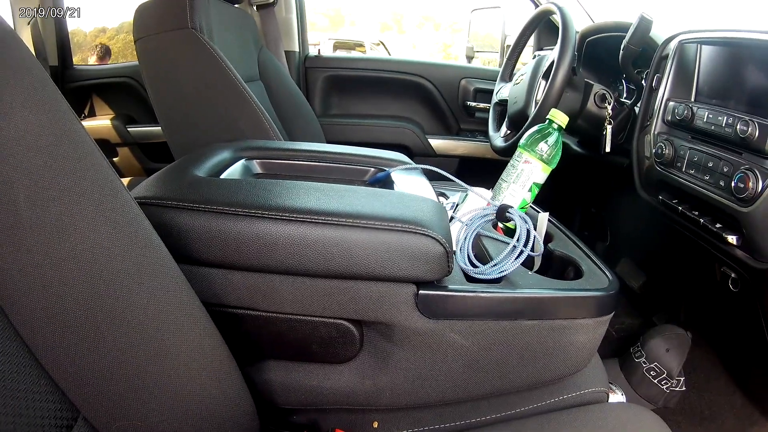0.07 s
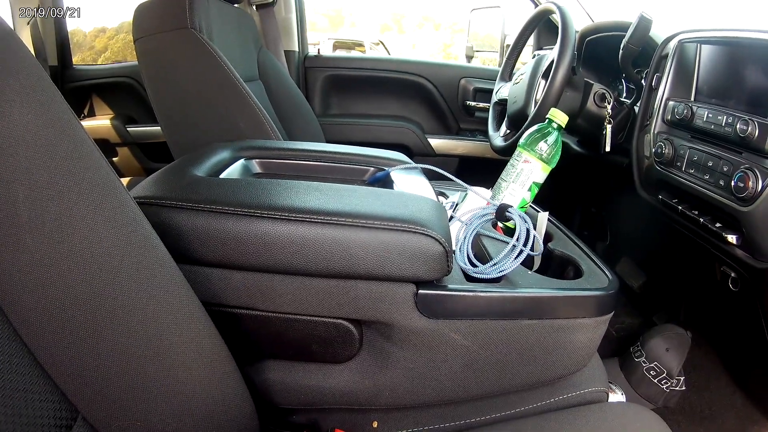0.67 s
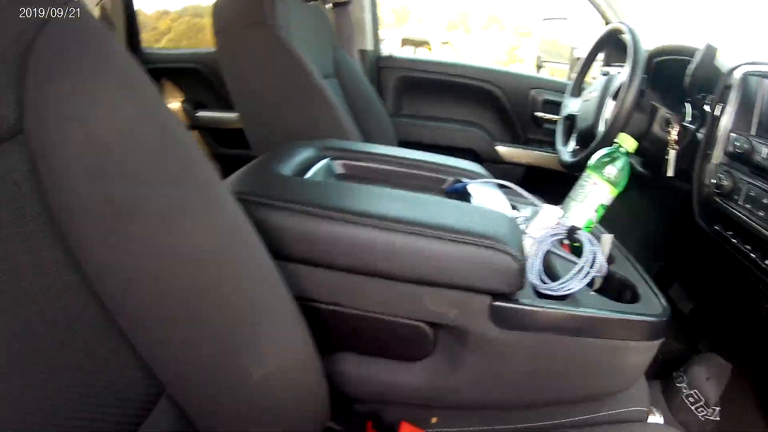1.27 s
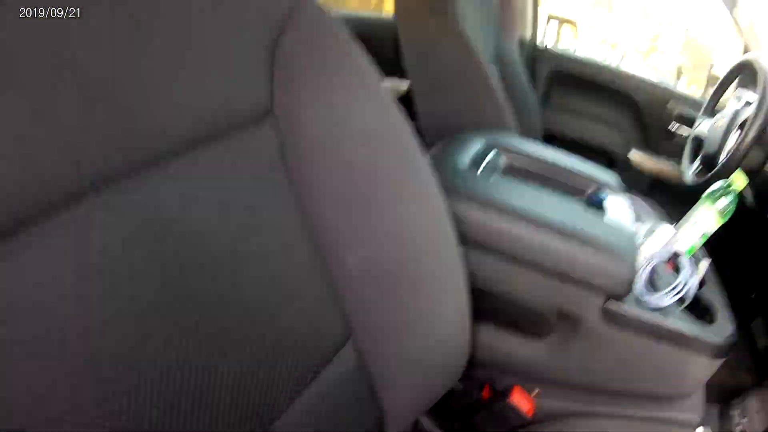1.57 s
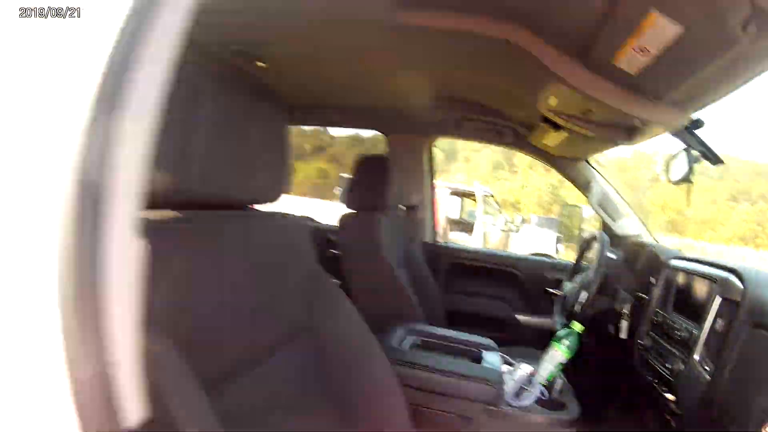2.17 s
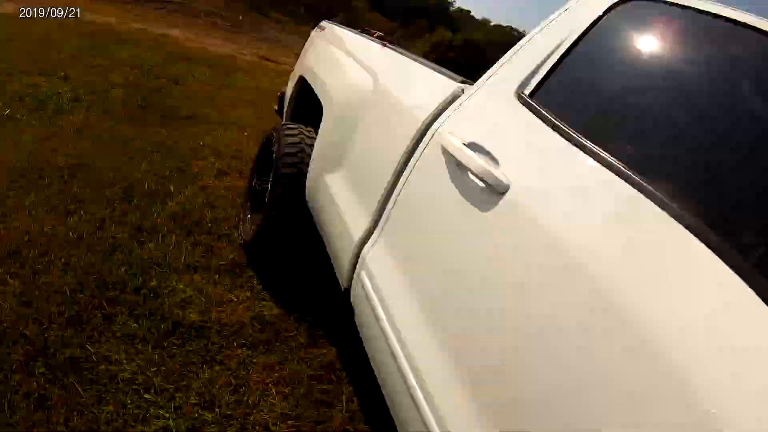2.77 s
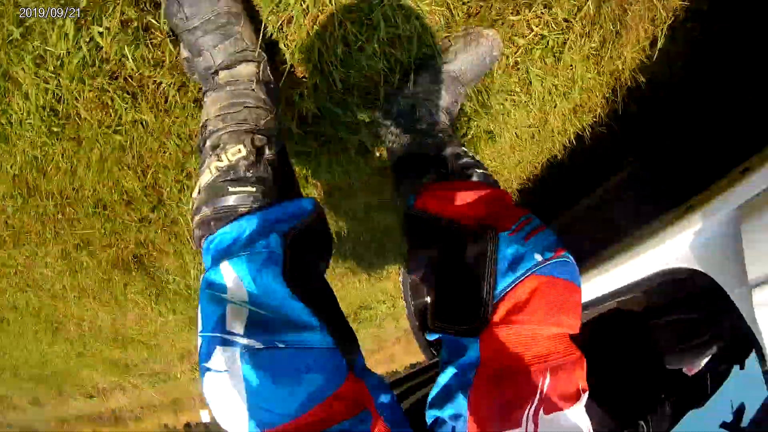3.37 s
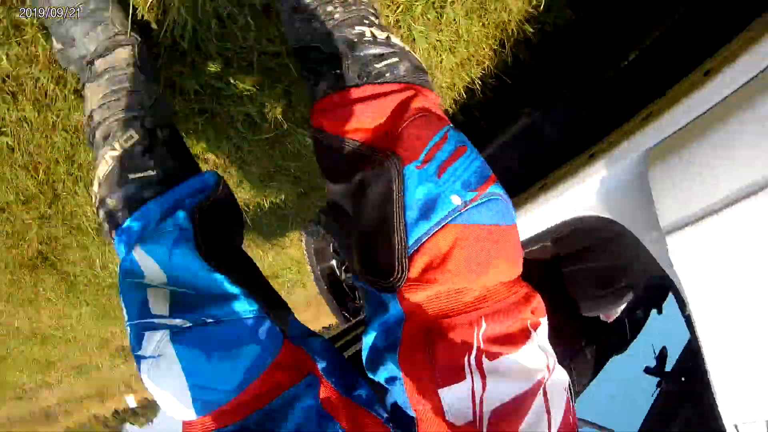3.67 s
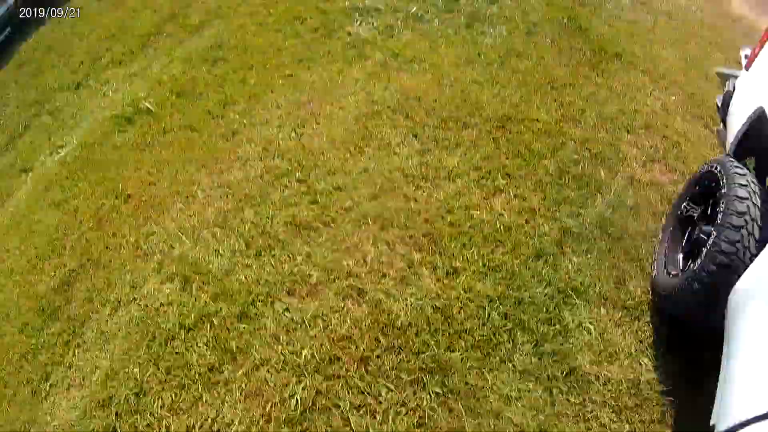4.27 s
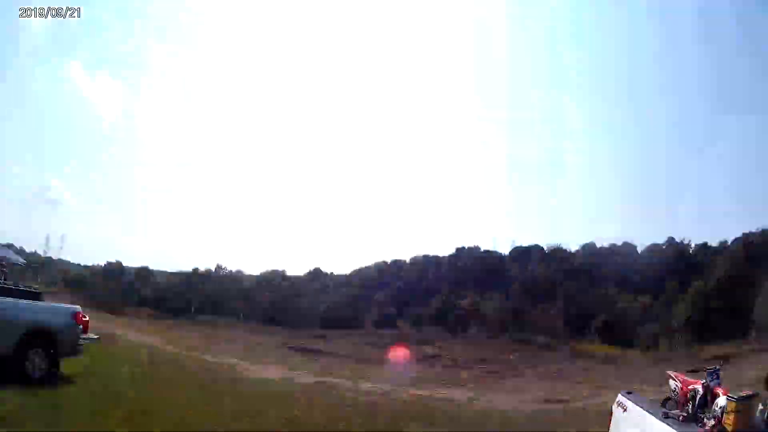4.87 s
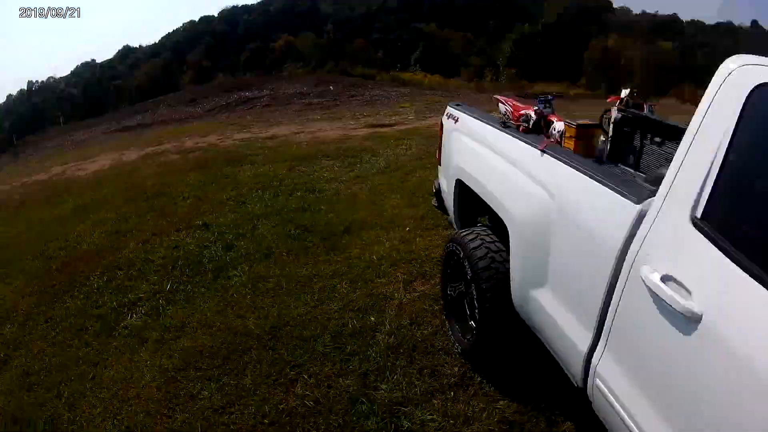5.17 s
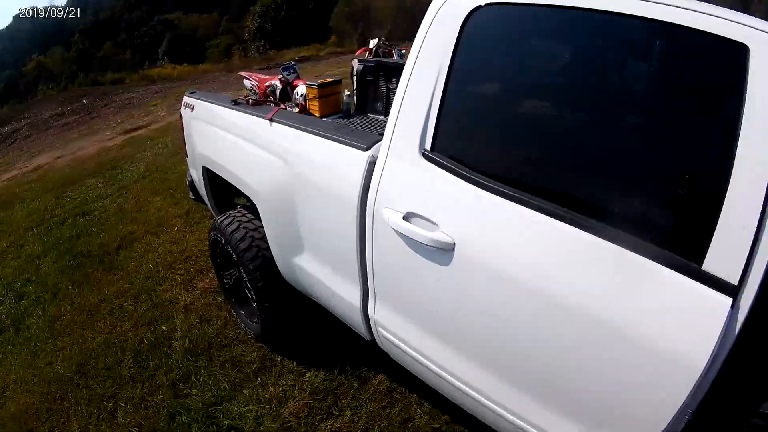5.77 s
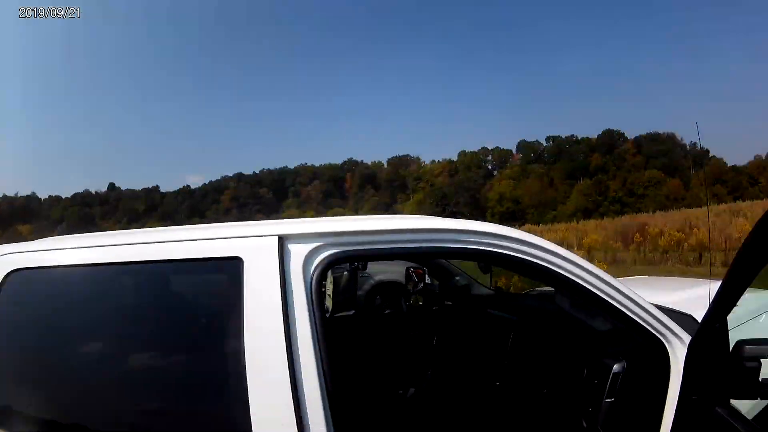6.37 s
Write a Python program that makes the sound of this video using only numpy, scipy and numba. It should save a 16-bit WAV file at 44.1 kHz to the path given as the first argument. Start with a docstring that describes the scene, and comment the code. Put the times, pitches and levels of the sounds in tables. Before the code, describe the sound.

Very close knocks and rattles strike the plastic case around a body-worn microphone as a person shifts off a truck seat and steps onto grass. They come singly at first, then bunch into louder clatters in the second half, mixed with low thumps, rumble and light rubbing of clothing. A small metal part rings faintly after the harder hits. Behind lie a thin hiss and a soft distant rush that grows toward the end.

```python
"""A quiet open field, beside a parked pickup. A rider in boots and nylon gear climbs out onto the grass.
The microphone is inside the plastic case of a camera worn on the body, so the handling is very close:
knocks and rattles all ring the same shell, and a small metal part sings on faintly. Body movements
thump through the mount and cloth rubs nearby. Behind it lie a thin hiss and a soft far-off rush."""
import sys
import numpy as np
from scipy import signal
from scipy.fft import rfft, irfft
from scipy.io import wavfile
from scipy.ndimage import uniform_filter1d
from numba import njit

SR = 44100
rng = np.random.default_rng(int(sys.argv[2]) if len(sys.argv) > 2 else 0)


def unload_audio(sound):
    """Save the sound as a 16-bit wav file, at the path given as the first command line argument."""
    columns = np.transpose(np.atleast_2d(sound))
    # keep every value between -1 and 1, then stretch to whole-number steps
    steps = np.round(np.clip(columns, -1, 1) * 32767)
    wavfile.write(sys.argv[1], SR, steps.astype(np.int16))


N = 286650
TIME = np.arange(N) / SR
FREQ = np.fft.rfftfreq(2 * N, 1 / SR) + 1e-3

# blows on the case, right at the microphone; hard_hz and bass_hz are the corners of the contact:
# start_s, impulse_db, hard_hz, bass_hz, damping, rim_echo_s, rim_share
CASE_BLOWS = [(1.4005, 0.4, 7660, 1473, 0.59, 0.0014, -0.24), (1.4853, -12.5, 7073, 671, 2.69, 0.001, 0.29),
              (2.8487, -16.5, 10590, 309, 1, 0.0019, 0.83), (2.8839, 11, 4030, 474, 2.8, 0.0015, -0.048),
              (3.538, -29.5, 1600, 150, 1, 0.0012, 0.49), (3.8369, -11.5, 12300, 5243, 1.1, 0.0004, 0.35),
              (3.842, -10.5, 4020, 645, 1.78, 0.00053, 0.32), (4.413, 11, 5900, 966, 1.72, 0.00054, -0.47),
              (4.417, 18, 1360, 4640, 1.16, 0.00065, 0.95), (4.4207, -4, 6500, 1671, 1, 0.00031, 0.47),
              (4.4468, 5.5, 1270, 460, 0.93, 0.0022, -0.31), (4.5323, -2.5, 1170, 102, 1.3, 0.0022, -0.077),
              (4.7033, 1.5, 1360, 173, 1.8, 0.0017, 0.16), (4.831, -1.1, 1140, 157, 1.6, 0.0018, 0.057),
              (5.1182, 5, 2181, 217, 8.2, 0.00082, -0.41), (5.142, -9.5, 3530, 476, 0.5, 0.00087, 0.38),
              (5.2899, -10.5, 3570, 3244, 1.2, 0.0012, 0.62),
              (5.307, -17, 5200, 3510, 0.33, 0.00058, -0.49), (5.3624, 14, 3450, 49, 5, 0.0011, -0.3),
              (5.3694, 8.5, 7700, 3970, 0.97, 0.00021, -0.39), (5.3806, -6.5, 4800, 111, 1.6, 0.002, 0.15),
              (5.469, -4, 20570, 833, 1.9, 0.00053, 0.61), (5.4847, 14, 6460, 6300, 5.1, 0.00047, 0.41),
              (6.0512, -31.5, 3499, 153, 0.75, 0.00047, -0.8), (6.1263, 14, 2120, 830, 1.98, 0.0024, 0.053),
              (6.305, 1.15, 1550, 34, 1.46, 0.00082, -0.31)]


def case_knocks(slips_per_s=140, spring_db=0.5):
    """Blows, taps and slips ring the plastic shell, its mount and a loose metal part."""
    # light taps and soft dull knocks on the case: start_s, impulse_db, hard_hz
    light_taps = [(2.376, -25, 2600), (2.78, -37, 12000), (3.2, -30, 450), (3.257, -25.5, 1100),
                  (3.447, -27.5, 900), (3.796, -30, 900), (4.39, -22, 2200), (4.405, -13, 1398),
                  (4.507, -24, 12000), (4.741, -18.5, 700), (4.861, -22, 450), (5.129, -13, 1200),
                  (5.157, -24, 4000), (5.358, -8, 1830), (5.387, -14, 10100), (5.406, -16, 2600),
                  (5.44, -22.5, 9000), (5.748, -26, 2190), (5.787, -22.5, 1300)]
    # gear dragging and creaking against seat and case: start_s, length_s, impulse_db, hard_hz
    gear_drags = [(1.273, 0.076, -33.5, 2300), (1.491, .032, -25, 1570), (2.956, 0.031, -32.5, 1200),
                  (3.255, 0.033, -32, 1100), (4.89, .19, -37.5, 1200), (5.06, .055, -26, 550),
                  (5.771, 0.076, -36.5, 2800)]
    # modes of the plastic shell: pitch_hz, gain_db, t60_s
    shell_modes = [(378, 4, 0.0037), (742, 1.5, 0.028), (905, 10.5, 0.042), (1065.6, 11.5, .04),
                   (1160, 11.5, .03), (1390, 3, 0.044), (1511, 5, 0.035), (1670, 8.5, 0.02),
                   (1848, 6.5, 0.027), (1965, 2, 0.03), (2164, -2.5, 0.065), (2335, -2.5, .022),
                   (2880, -3, .026), (3146, -7, 0.014), (3585, -9.5, .02), (4270, -9.5, 0.014),
                   (5090, -13.5, 0.016), (5540, -13, 0.0093), (6100, -18, .025), (6720, -15.5, 0.016),
                   (10970, -17.5, 0.0085), (12000, -20.5, .006), (14818, -27.5, .0035)]
    # long faint modes of the metal part, perhaps a latch spring: pitch_hz, relative_db, t60_s
    spring_modes = [(2102, 5, .18), (2462, -9, .55), (2503, -6, .55), (2618, -8.5, .5), (2722, -8.5, .55),
                    (2795, -11, .5), (3236, -10.5, .6), (3286, -8.5, .7), (3365, -10, .55),
                    (4420, -23, .24)]
    force = sum(touch(*row) for row in light_taps)
    force += sum(scrape(*row, slips_per_s) for row in gear_drags)
    force += sum(blow(*row) for row in CASE_BLOWS)
    buzz = chatter(force, low_hz=1630, high_hz=3650, db=-3.0, decay_s=0.0049)
    buzz += chatter(force, low_hz=3760, high_hz=7440, db=-11.0, decay_s=0.0075)
    buzz += chatter(force, low_hz=9200, high_hz=13800, db=-5.5, decay_s=0.0044)
    shell = ring(force + buzz, shell_modes, bend=.003 * wander(per_s=9))  # the straps flex the shell
    spring = ring(force, spring_modes, bend=.002 * wander(per_s=90))  # it sits loosely and trembles
    return through_wall(shell + arm_boom(force) + undb(spring_db) * spring)


def blow(start_s, db, hard_hz, bass_hz, damping, rim_echo_s, rim_share, cushion=1.64, size=4096):
    """Force of one contact: a soft one pushes longer and loses treble, a light one loses bass."""
    jf = 1j * np.fft.rfftfreq(size, 1 / SR)
    rebound = jf / (jf + bass_hz)
    contact = rebound / (1 + damping * jf / hard_hz + (jf / hard_hz) ** 2)
    give = 1 + jf / (cushion * hard_hz) + (jf / (cushion * hard_hz)) ** 2  # surfaces yield at first
    spot = 1 + rim_share * np.exp(-2 * np.pi * jf * rim_echo_s)  # the rim's echo colours each spot
    force, start = np.zeros(N + size), int(start_s * SR)
    force[start:start + size // 2] = undb(db) * irfft(contact * spot / give)[:size // 2]
    return force[:N]


def touch(start_s, db, hard_hz):
    """A light contact on a random spot of the case."""
    return blow(start_s, db, hard_hz, bass_hz=150, damping=2.0,
                rim_echo_s=rng.uniform(0, .0012), rim_share=rng.choice([-1, 1]) * 0.25)


def scrape(start_s, length_s, db, hard_hz, slips_per_s):
    """Dragging gear: a short run of uneven slips that swells and fades."""
    count = int(length_s * slips_per_s) + 1
    along = (np.arange(count) + rng.random(count)) / count
    return sum(np.sqrt(np.sin(np.pi * a)) * touch(start_s + a * length_s, db, hard_hz) for a in along)


def chatter(force, low_hz, high_hz, db, decay_s):
    """The loose joint buzzes for a few milliseconds, as strongly as it was struck in this band."""
    band = signal.butter(4, [low_hz, high_hz], "bandpass", fs=SR, output="sos")
    keep = np.exp(-2 / (decay_s * SR))
    energy = signal.lfilter([1 - keep], [1, -keep], signal.sosfilt(band, force + 1e-18) ** 2)
    return undb(db) * np.sqrt(energy) * unit(signal.sosfilt(band, rng.standard_normal(N)))


def arm_boom(force):
    """The mount arm swings after each blow and adds a short hollow boom."""
    # low modes of the arm: pitch_hz, gain_db, width_hz
    arm_modes = [(156, 22.5, 25), (202, 12.5, 31)]
    return sum(undb(db) * signal.lfilter(*signal.iirpeak(hz, hz / width, fs=SR), force + 1e-18)
               for hz, db, width in arm_modes)


def through_wall(x):
    """The shell holds back its strongest bands a moment; the microphone cavity swallows some treble."""
    # bands shaped on the way to the microphone: centre_hz, width_hz, delay_s, gain_db
    wall_bands = [(1126, 300, 0.002, 2), (1990, 900, 0.0022, 1.5), (4970, 250, 0.0034, 4.5),
                  (5890, 310, 0.003, -3.5), (7910, 800, 0.0005, -18), (9300, 2000, 0.0031, -5),
                  (12100, 1000, 0, 3.5), (13400, 800, 0.0084, -9.5)]
    lag_s = sum(delay / (1 + (2 * (FREQ - hz) / width) ** 2) for hz, width, delay, _ in wall_bands)
    phase = 2 * np.pi * np.cumsum(lag_s) * (FREQ[1] - FREQ[0])
    gain = undb(sum(db * np.exp(-(2 * (FREQ - hz) / width) ** 2) for hz, width, _, db in wall_bands))
    return irfft(rfft(x, 2 * N) * gain * np.exp(-1j * phase))[:N]


def mount_slams():
    """The hardest jolts drive the mount against its stop with a short dull bump."""
    # hits on the stop, the last a bounce: start_s, impulse_db
    stop_hits = [(4.414, 12), (5.3636, 23), (5.368, 28)]
    # dead modes of the stop: pitch_hz, gain_db, t60_s
    stop_modes = [(102, 6.5, 0.048), (229, -2, 0.029), (389, -8.5, 0.019)]
    force = np.zeros(N)
    for start_s, db in stop_hits:
        force[int(start_s * SR)] = undb(db)
    return ring(force, stop_modes)


def body_thumps(width_cycles=0.61):
    """Each jolt of body or boot sways the camera for a cycle or so."""
    # jolts coming up through the mount: centre_s, level_db, pitch_hz
    jolts = [(1.115, -45.5, 60), (1.193, -35.5, 32.2), (2.39, -34.5, 28.2), (2.905, -36.5, 50),
             (2.99, -41, 58.4), (3.137, -34, 32.4), (3.267, -32.5, 52), (3.539, -33.5, 89),
             (3.806, -27, 66), (3.971, -39.5, 46.5), (4.435, -23.5, 38.4), (4.482, -25, 26.6),
             (5.153, -26, 48.9), (5.378, -9.5, 40.4), (5.568, -27, 30.9), (5.713, -32.5, 31.7),
             (6.18, -38, 35)]
    out = np.zeros(N)
    for centre_s, db, hz in jolts:
        cycles = (TIME - centre_s) * hz
        near = np.abs(cycles) < 4
        envelope = np.exp(-(cycles[near] / width_cycles) ** 2)
        out[near] -= undb(db) * np.sin(2 * np.pi * cycles[near]) * envelope
    return out


def clothing_and_rumble(rub_shake_db=3, knock_shake_db=-42, light_part_hz=900):
    """Cloth rubs and nylon swishes close by; the mount rumbles with each movement, rub and knock."""
    # cloth rubs, one for each movement of the body: start_s, length_s, level_db
    rubs = [(1.07, 0.2, -65.5), (1.26, 0.055, -54), (1.74, 0.083, -64), (2.15, 0.13, -62.5),
            (2.73, 0.31, -62.5), (3.03, 0.19, -60.5), (3.64, 0.19, -62.5), (4.6, 0.51, -55),
            (4.89, 0.23, -52.5), (5.74, 0.12, -63)]
    # nylon sleeves and legs brushing past each other: start_s, length_s, level_db
    swishes = [(1.25, 0.087, -77.5), (5.68, 0.16, -76), (6.19, 0.14, -74.5)]
    # the rider shifts on the seat, steps out and walks: start_s, length_s, level_db
    movements = [(1.07, 0.43, -51), (1.74, 0.2, -58.5), (2.66, 1.7, -56), (4.4, 1.65, -53)]
    # spectra of rubbing cloth, swishing nylon and the rumbling mount: frequency_hz, relative_db
    cloth_spectrum = [(110, -10), (170, -2), (215, -10), (300, -19), (440, -28), (630, -23.5), (780, -17.5),
                      (950, -20.5), (1150, -17), (1300, -30), (1700, -25), (2200, -38), (3800, -45)]
    nylon_spectrum = [(2500, 1.5), (3700, -3.5), (4700, -8), (5700, -3.5), (6300, -12)]
    rumble_spectrum = [(20, 3), (38, 2.5), (60, -7.5), (100, -5), (145, -13.5)]
    # light parts, with their high bass corner, hardly shake the mount
    shakes = [(start_s, .01, db + knock_shake_db - 20 * np.log10(1 + bass_hz / light_part_hz))
              for start_s, db, _, bass_hz, *_ in CASE_BLOWS]
    rub = swells(rubs, attack_s=0.036, release_s=0.057)
    swish = swells(swishes, attack_s=0.072, release_s=.09)
    movement = swells(movements, attack_s=0.059, release_s=0.083)
    shake = swells(shakes, attack_s=.01, release_s=0.065)
    mount_motion = np.sqrt(movement ** 2 + shake ** 2 + (undb(rub_shake_db) * rub) ** 2)
    cloth = friction(cloth_spectrum, spurts_per_s=150, spurt_db=2.6) * rub
    nylon = friction(nylon_spectrum, spurts_per_s=130, spurt_db=3.0) * swish
    rumble = friction(rumble_spectrum, spurts_per_s=22, spurt_db=4.0) * mount_motion
    return cloth + nylon + rumble


def friction(spectrum, spurts_per_s, spurt_db):
    """Surfaces catch and slip: dense noise in quick uneven spurts."""
    return colour(rng.standard_normal(N) * undb(spurt_db * wander(spurts_per_s)), spectrum)


def open_field(air_db=-64, waver_db=0.5):
    """Still air with a thin even hiss; out of the cab a far-off rush grows and wavers."""
    # course of the distant rush: time_s, level_db
    rush_levels = [(0, -83), (2.6, -76.5), (4.3, -76), (5.3, -70), (5.6, -63.5), (6.0, -71), (6.249, -61.5),
                   (6.5, -69)]
    # spectra of the still air and the rush: frequency_hz, relative_db
    air_spectrum = [(20, 5), (40, 1), (100, 0), (200, -7), (450, -13.5), (1270, -23), (2300, -31),
                    (10000, -38), (13500, -35), (20000, -29.5)]
    rush_spectrum = [(500, -16.0), (900, -6.5), (1150, 0.5), (1400, -10.5), (1900, -18.0), (3000, -16.5)]
    rush = colour(rng.standard_normal(N), rush_spectrum)
    air = colour(rng.standard_normal(N), air_spectrum) * undb(air_db)
    rush_db = np.interp(TIME, *np.transpose(rush_levels)) - waver_db * wander(per_s=3.6)
    return air + rush * undb(rush_db)


def ring(force, modes, bend=0):
    """Damped modes driven by a force; bend raises every other mode by that share and lowers the rest."""
    out = np.zeros(N)
    for k, (hz, db, t60_s) in enumerate(modes):
        turn = 2 * np.pi * hz / SR * (np.ones(N) + (-1) ** k * bend)
        out += undb(db) * resonate(force, turn, np.log(1000) / (t60_s * SR))
    return out


@njit
def resonate(force, turn, decay):
    """One damped mode whose pitch (turn, in radians per sample) may move."""
    out = np.empty(len(force))
    keep = np.exp(-decay)
    last, before = 0., 0.
    for i in range(len(force)):
        drive = 2 * decay * np.sin(turn[i]) * force[i]
        out[i] = drive + 2 * keep * np.cos(turn[i]) * last - keep * keep * before + 1e-18
        last, before = out[i], last
    return out


def swells(gestures, attack_s, release_s):
    """Gain of gestures that each build up, hold while the motion lasts and die away."""
    power = np.zeros(N)
    for start_s, length_s, db in gestures:
        rise = np.clip((TIME - start_s) / attack_s, 0, 1)
        fall = np.exp(-np.maximum(TIME - start_s - length_s, 0) / release_s)
        power += (undb(db) * rise * fall) ** 2
    return np.sqrt(power)


def colour(x, spectrum):
    """Shape x with a spectrum that falls steeply past both ends; rms 1."""
    hz, db = np.transpose(spectrum)
    gain = undb(np.interp(np.log(FREQ), np.log(hz), db))
    skirts = (1 + (hz[0] / FREQ) ** 8) * (1 + (FREQ / hz[-1]) ** 8)
    return unit(irfft(rfft(x, 2 * N) * gain / skirts)[:N])


def wander(per_s):
    """Random steps smoothed twice; rms 1."""
    hold = int(SR / per_s)
    steps = np.repeat(rng.standard_normal(N // hold + 1), hold)
    return unit(uniform_filter1d(uniform_filter1d(steps, hold), hold)[:N])


def undb(db):
    """Decibels to gain."""
    return 10 ** (np.asarray(db) / 20)


def unit(x):
    """Scale to rms 1."""
    return x / np.sqrt(np.mean(x ** 2))


def scene():
    """Everything reaches one microphone inside the case; a blow first pulls the pressure down."""
    return (body_thumps() - case_knocks() - mount_slams() + clothing_and_rumble() + open_field())[None]


def record(dry, low_cut_hz=12, top_hz=15800):
    """The camera cuts the deepest bass and the top."""
    dry = signal.sosfilt(signal.butter(1, low_cut_hz, "highpass", fs=SR, output="sos"), dry)
    return signal.sosfilt(signal.ellip(10, .2, 70, top_hz, fs=SR, output="sos"), dry)


dry = scene()
out = record(dry)
unload_audio(out)
```